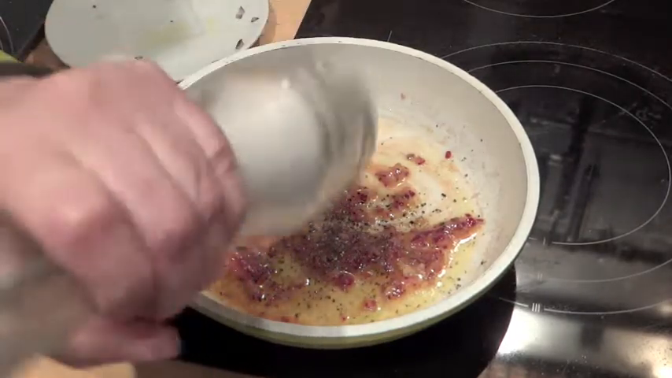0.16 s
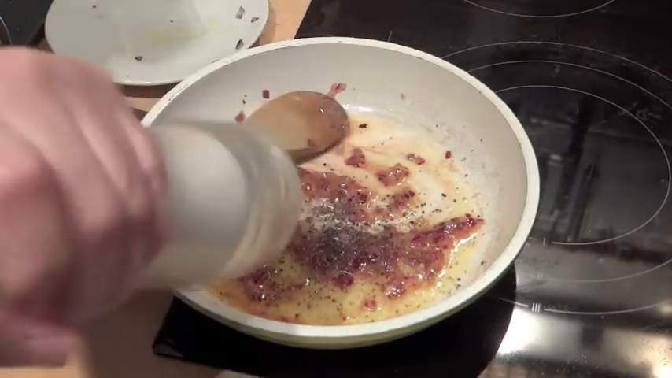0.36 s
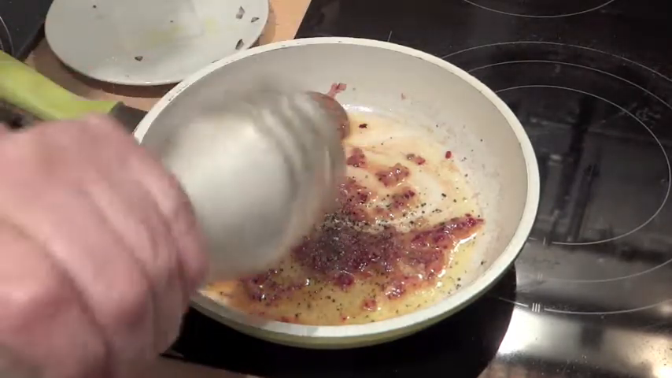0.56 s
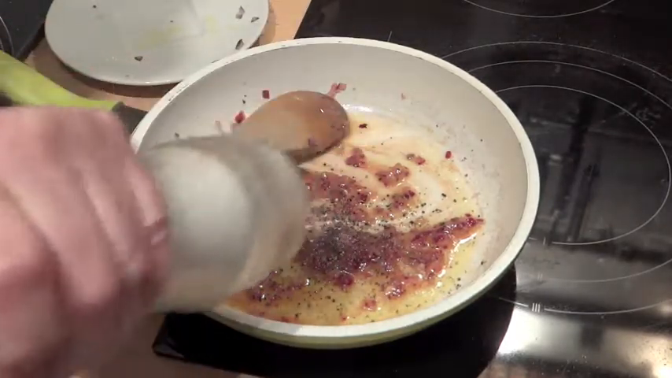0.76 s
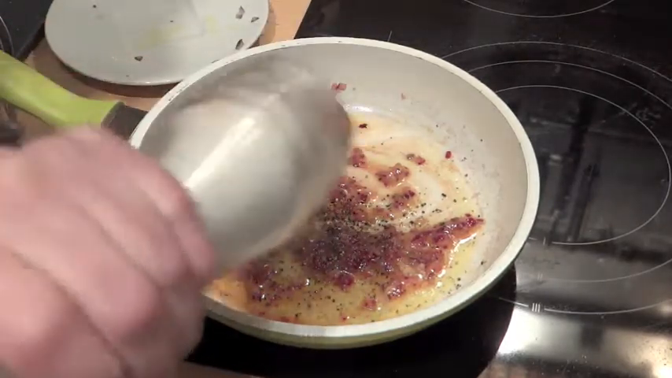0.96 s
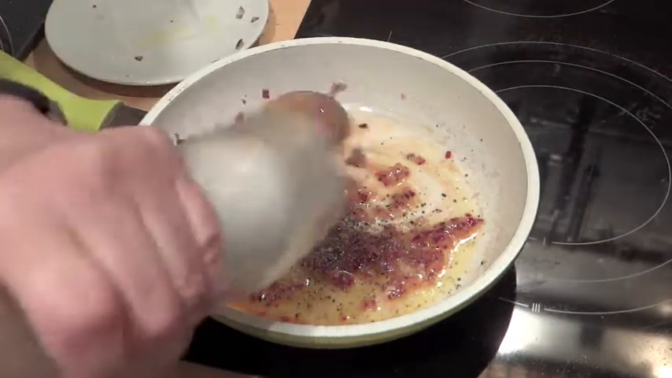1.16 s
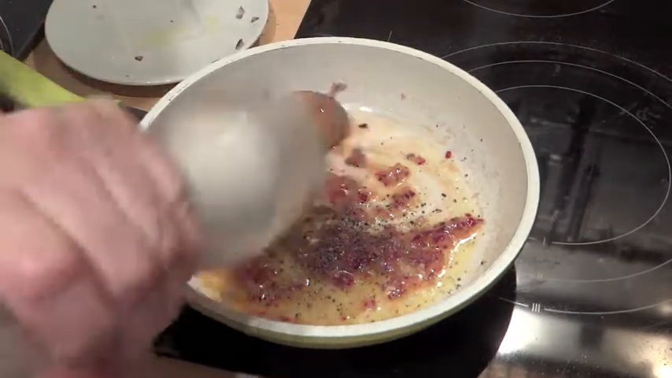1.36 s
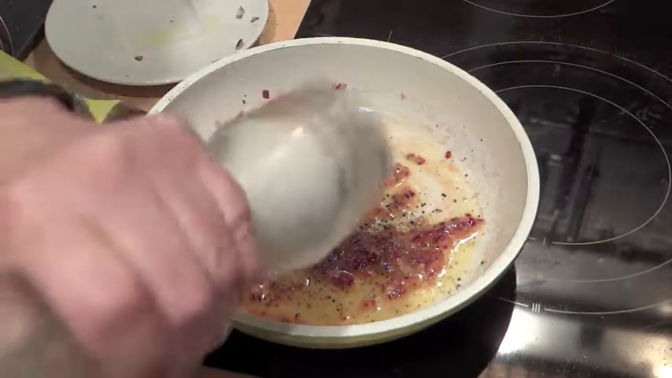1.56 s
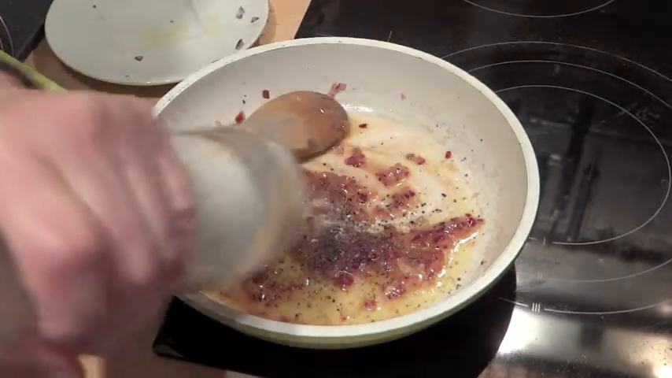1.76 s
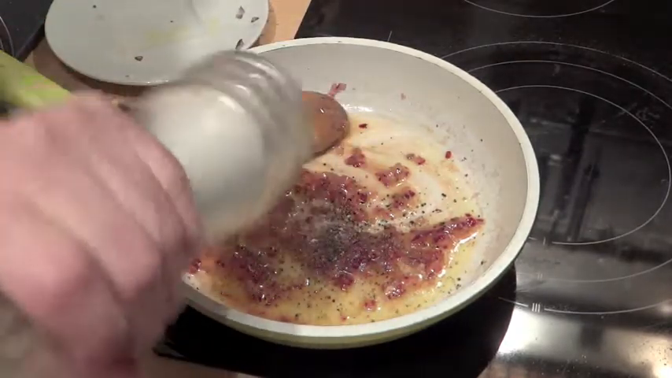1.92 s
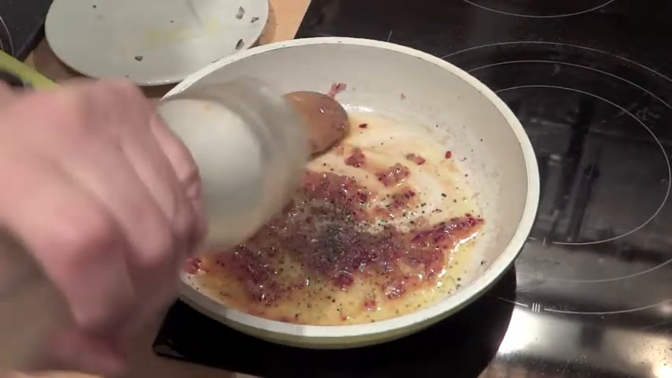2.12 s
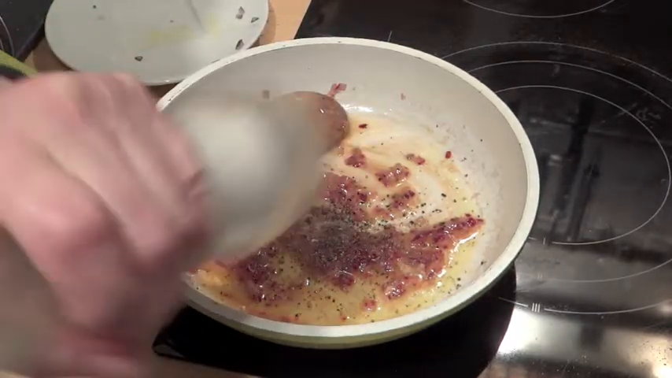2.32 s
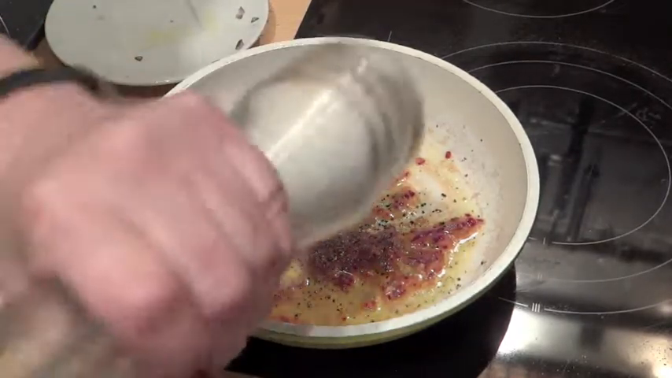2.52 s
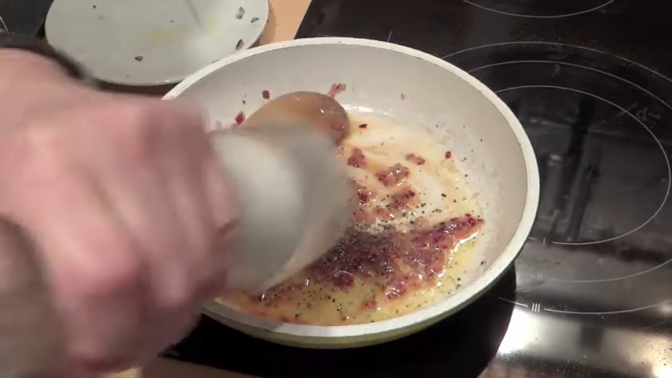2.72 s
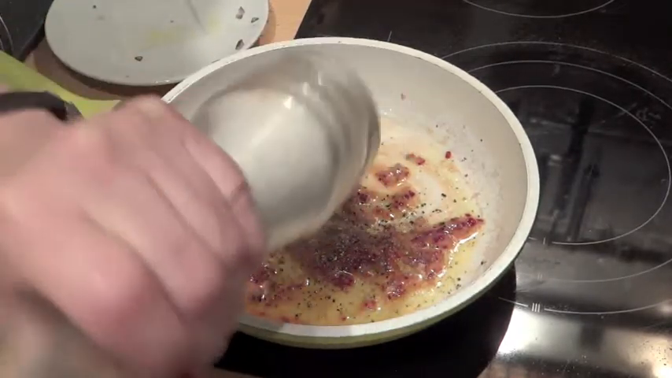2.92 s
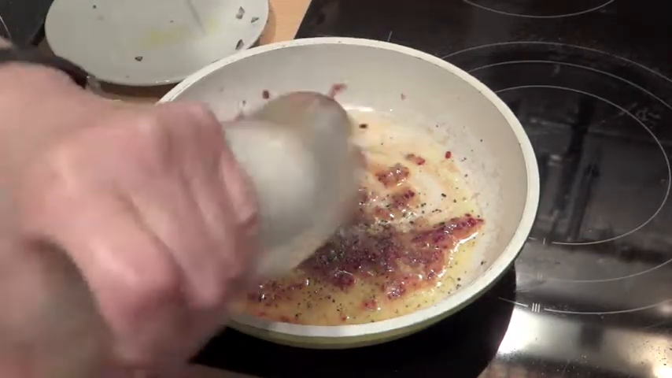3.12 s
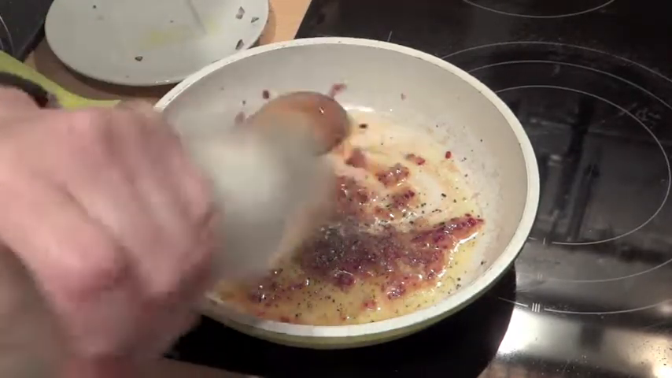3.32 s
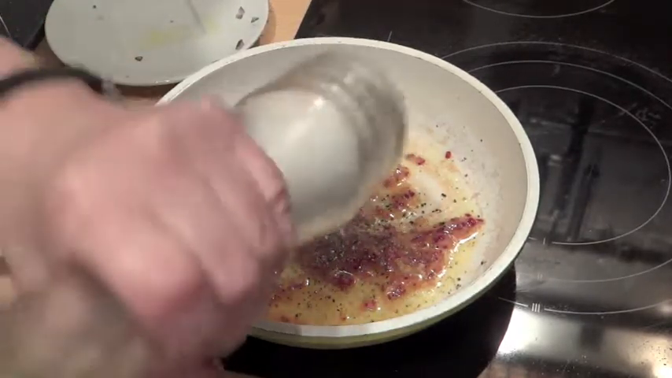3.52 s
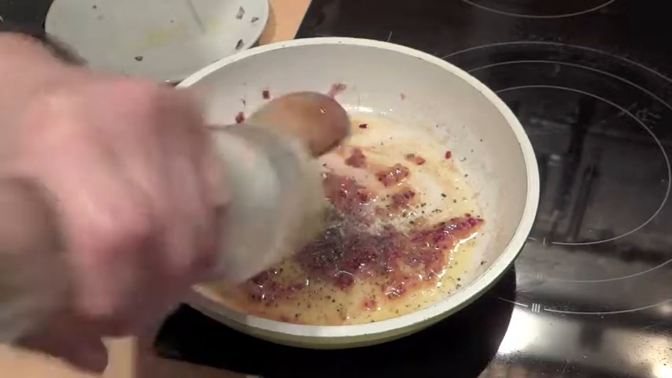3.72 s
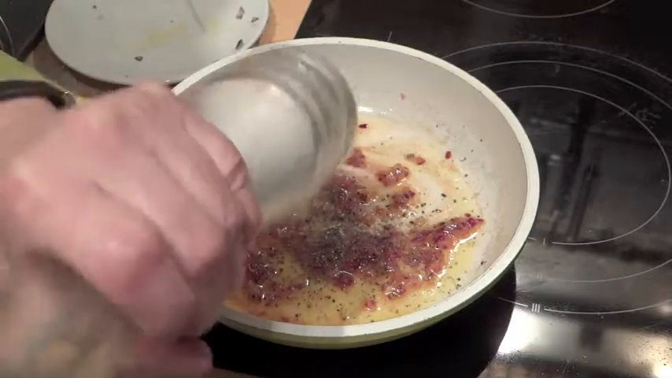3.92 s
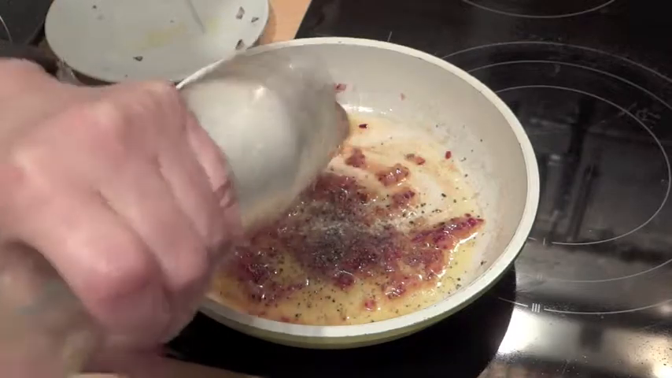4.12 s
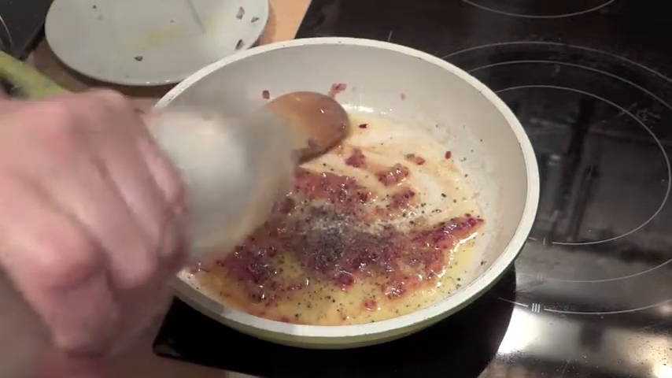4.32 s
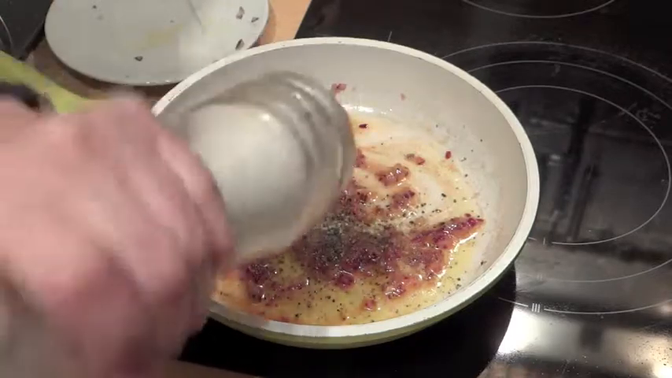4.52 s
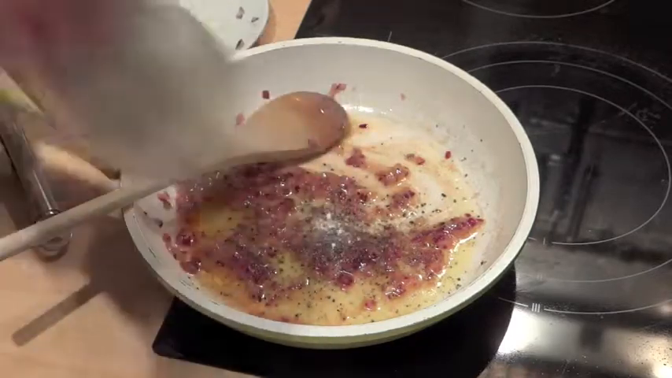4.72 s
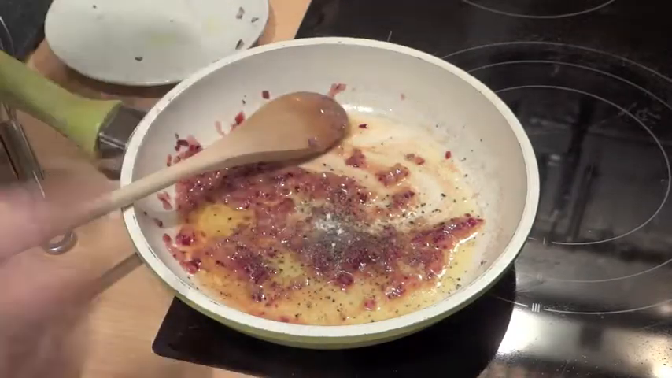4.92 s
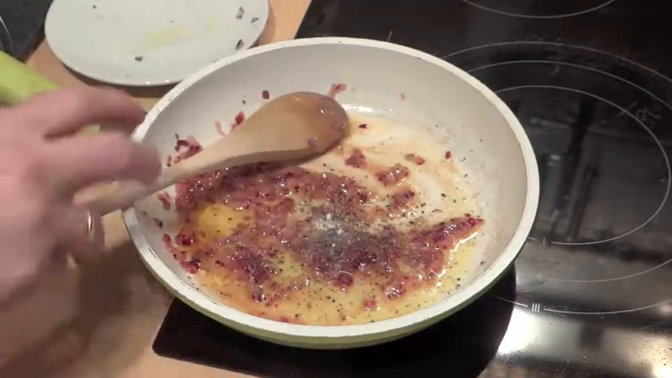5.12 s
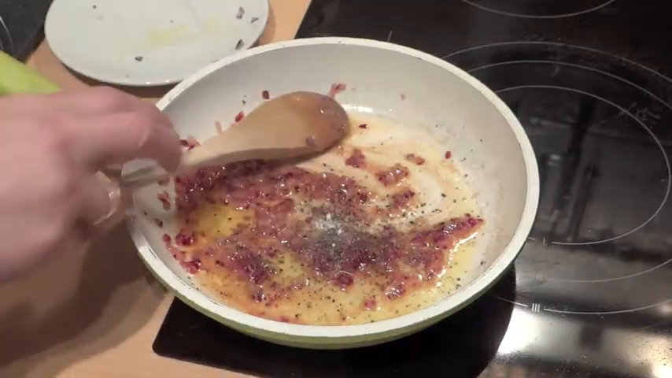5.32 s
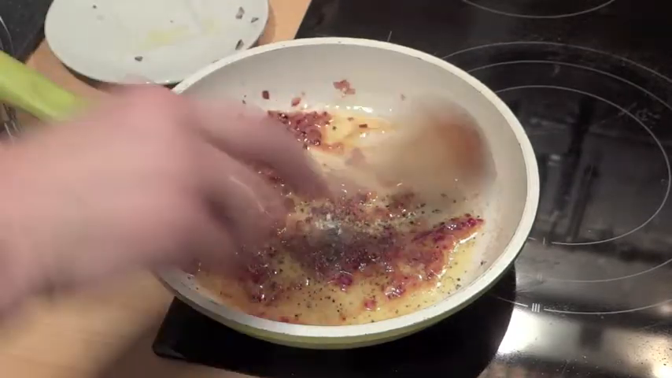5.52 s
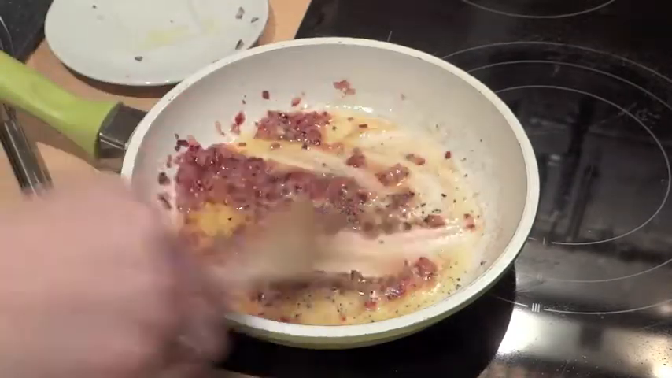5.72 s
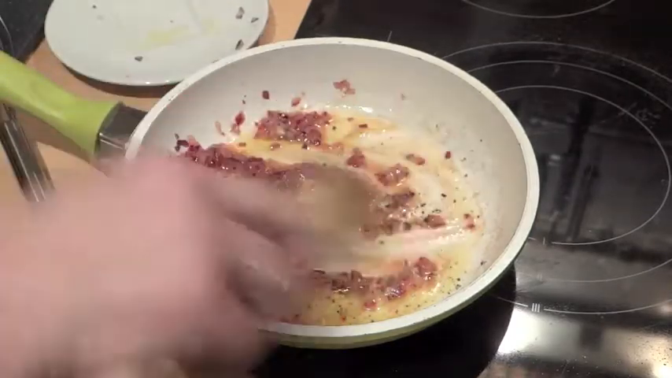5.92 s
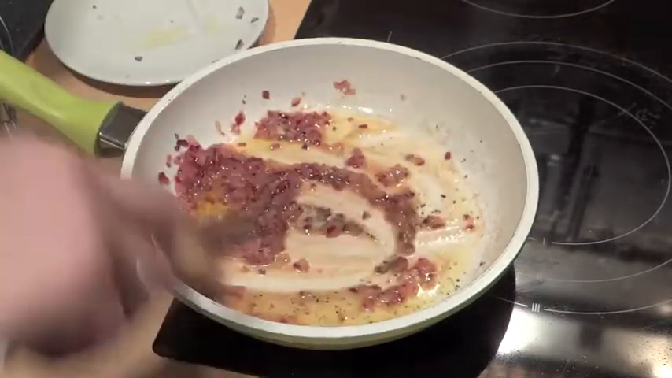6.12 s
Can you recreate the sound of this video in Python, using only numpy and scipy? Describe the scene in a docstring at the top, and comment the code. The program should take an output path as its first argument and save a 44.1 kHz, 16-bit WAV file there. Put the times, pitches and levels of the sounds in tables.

```python
"""A small kitchen with a steady hum and hiss, heard by a close pair of microphones.
A metal spice mill is twisted by hand over a pan in ten short strokes: grains fracture between the
burrs, and the impulses excite the modes of the mill's body. Between strokes the hand regrips with
soft friction. Then the mill is put away, and a wooden spoon knocks and scrapes through the pan,
driving its modes by impact and by friction."""
import sys
import numpy as np
from scipy import signal
from scipy.io import wavfile

SR = 44100
rng = np.random.default_rng(int(sys.argv[2]) if len(sys.argv) > 2 else 0)


def wav_out(sig):
    """Save sig, one row per channel (or a flat mono array), as 16-bit PCM at SR to the path in sys.argv[1]."""
    wavfile.write(sys.argv[1], SR, np.round(np.clip(np.atleast_2d(sig).T, -1, 1) * 32767).astype(np.int16))


N = 276494

# Levels in the tables are relative: each source applies its own gain.
# room noise spectrum: (frequency [Hz], density [dB])
ROOM_NOISE = [(15, -42), (25, -12.5), (99, -2.5), (152, -3.5), (212, 0.5), (344, -5), (635, -5),
              (1330, -11.5), (2160, -17.5), (2930, -11), (3410, -19), (5970, -18.5), (8310, -23.5),
              (9930, -17.5), (11000, -20), (14300, -50), (22000, -120)]
# likeness of left and right in that noise: (frequency [Hz], correlation [1])
COHERENCE = [(60, 1), (220, 0.58), (820, 0.0069), (3040, 0.13), (11200, 0.76)]
# wavering appliance hum: (frequency [Hz], bandwidth [Hz], level [dB])
HUM_PARTIALS = [(91.8, 1.8, -74.5), (215, 7.9, -70.5), (264, 19, -90)]

# sliding friction spectrum: (frequency [Hz], density [dB])
FRICTION_SPECTRUM = [(120, -30), (200, 8.5), (470, 1), (625, 12), (1020, -5), (1450, 5.5), (2160, 1.5),
                     (8550, -5.5), (11000, -22), (14300, -41), (22000, -120)]
# the hand slides to a new grip: (peak time [s], treble [dB], weight [dB], fade [dB/s])
REGRIPS = [(.15, -54.5, -2, 150), (.21, -48.5, -8, 102.5), (.69, -54.5, -15, 150), (1.127, -47, -5.5, 203),
           (1.202, -53.5, -15.5, 296), (1.556, -55, 3.5, 97), (1.63, -48.5, -7, 240), (2.064, -53, 4, 105),
           (2.11, -90, -1, 125.5), (2.524, -54, 2.5, 147.5), (2.644, -55, -8, 144), (3.1, -55, 3.5, 126.5),
           (3.162, -73, -18, 300)]
# hand and sleeve as the mill is put away: (time [s], treble [dB], weight [dB])
PUTTING_AWAY = [(4.6, -66, 3.5), (4.682, -58, -1.5), (4.735, -51, 2), (4.77, -50.5, -0.5), (4.9, -52, 0),
                (5.03, -52, -0.5), (5.108, -48, -5), (5.2, -52.5, -8.5), (5.3, -57.5, -18), (5.33, -75, -8)]

# resonances of the pan: (frequency [Hz], bandwidth [Hz], level [dB])
PAN_MODES = [(119, 20, 4), (151, 24, -3), (235.4, 48, -27), (313, 60, -4), (414, 44, -0.5), (566, 49, -14),
             (686, 53, -35), (1220, 67, -13), (1427, 40, -7), (1888, 71, -33), (2470, 46, -9.5),
             (2660, 71, -11), (3530, 100, -28.5), (3780, 65, -14.5), (4010, 55, -10.5), (5630, 250, -15),
             (8100, 1260, -5), (8920, 1300, 0)]
# the spoon drags: (time [s], treble [dB], weight [dB], squeak near 1.4 kHz re treble [dB])
SCRAPES = [(5.3, -64, -14, -28), (5.352, -52.5, -22, -10), (5.4, -54, -9, -23), (5.52, -68, 3, -15),
           (5.57, -65, 1, -10), (5.604, -47, -18, -21), (5.65, -57.5, 1, -11), (5.75, -58.5, 1, 2.5),
           (5.8, -68.5, 4, 5), (5.846, -52, -11, -9), (5.89, -51.5, -3.5, -2.5), (5.93, -59.5, 3, 8),
           (5.96, -60.5, 6, -2), (5.99, -52, 1, -9.5), (6.05, -50, 6.5, -2), (6.096, -44, 12.5, -7),
           (6.144, -58, 4, 5), (6.156, -52.5, -16, -4), (6.204, -53, 6.5, -5), (6.27, -51.5, 3.5, -1)]
# spoon on pan, the last three re the peak:
# (time [s], peak [dB], hob thump [dB], hollow ring [dB], click [dB])
SPOON_KNOCKS = [(5.579, -35.5, -7, -13, -26), (5.592, -28.5, -37, -26, -26), (5.612, -48, 8, -17, -10),
                (5.644, -38, -16, -26, -32), (5.675, -49, 3, -13, -14), (5.719, -53, 2, -7, -6),
                (6.068, -33.5, -23, -12, -10), (6.08, -35, -36, 5, -18), (6.095, -29, -19, -17, -22),
                (6.109, -35, -29, -5, -23), (6.151, -35, -27, -15, -10)]

# The mill's five bands are treble, rasp (5 kHz), body (3 kHz), middle and low.
# spectrum of crushing grains: (frequency [Hz], density [dB])
CRUSH_SPECTRUM = [(120, -48), (200, -19.5), (433, 0.5), (658, -5), (1470, -1), (2390, 8.5), (2880, 28),
                  (3640, -31), (8000, -5), (9950, -16), (11000, -74), (14300, -43), (22000, -120)]
# resonances of the mill's body: (frequency [Hz], bandwidth [Hz], level [dB])
MILL_MODES = [(424, 20, -2.5), (1120, 95, -1.5), (1226, 66, -7), (1556, 28.6, -5), (1838, 30, -8),
              (2520, 44, -20), (2740, 190, 6.5), (2906, 45, 4.5), (3006, 17.4, 0), (2950, 9, -10),
              (3040, 32, -28), (4143, 160, -4), (5224, 220, 0), (5585, 330, -1.5), (6170, 200, -22),
              (6800, 200, -14), (7580, 66, -2.5), (8106, 330, 5), (9040, 860, 4)]
# strokes of the wrist: (bite time [s], creep before it [s], jump at the bite [dB], hold [s],
# level at the bite [dB], midway offset [dB], level at the end of the hold [dB],
# extra rasp [dB], extra body [dB], extra low [dB])
STROKES = [(0.002, 0.029, -1.5, 0.016, -26.5, 1, -34, -0.5, -4, -2.5),
           (0.377, 0.044, 0.5, 0.086, -35.5, 0, -36.5, -3, -3, -3),
           (0.817, 0.033, 4, 0.097, -38, 2.5, -37.5, 2, 0.5, -0.5),
           (1.306, 0.047, 2, 0.076, -39.5, -2, -31.5, -0.5, -0.5, -2.5),
           (1.801, 0.042, 14, 0.063, -26.5, -3.5, -34.5, -1, -0.5, 0.5),
           (2.286, 0.059, 0.5, 0.11, -41, 4.5, -36, 1, 0.5, 1.5),
           (2.79, .05, 3, .12, -35, 0.5, -37.5, -2.5, 2.5, 0.5),
           (3.3, 0.054, 7.5, 0.074, -31.5, -7, -33.5, -1.5, -0.5, 2.5),
           (3.788, 0.044, 1, 0.11, -33.5, -4, -35.5, 3, -1.5, 1),
           (4.305, 0.04, 2, 0.063, -36, 0, -35.5, -0.5, 1.5, 0.5)]
# balance at the end of the hold, per band: (level [dB])
HOLD_BALANCE_DB = [-0.5, -1, -4.5, -8, -18]
# offset from that balance at the bite, per band: (level [dB])
BITE_OFFSET_DB = [-0.5, -3.5, -6.5, -1, 0.5]
# big grains split, the last three re the treble:
# (time [s], treble [dB], rasp [dB], body [dB], middle [dB])
FRACTURES = [(0.3714, -31, -14, -14, -23), (0.4265, -20, -6, -8.5, -28), (0.4461, -12, -12, -11, -24),
             (0.816, -23.5, -13, -4, -23), (0.8243, -25, 7, -14, -22), (0.8684, -26, -8, -8, -20),
             (0.9065, -17.5, -5, -4.5, -12), (0.9234, -23, 7, 4.5, -22), (1.2973, -38, -11, -20.5, -4),
             (1.308, -29.5, 5.5, -16, -14), (1.3623, -9, -16, -8.5, -13), (1.7745, -47, -13, -9, -8),
             (1.788, -41, -12, 0, 6), (1.802, -23, 4, 4, -11), (1.815, -20, -19, 0, -34),
             (1.8378, -13, -19, -11, -24.5), (1.892, -21, -4, -9, -25), (2.2859, -20.5, -15, -16, -13),
             (2.3388, -36, -10, -8, -17.5), (2.3661, -29, -11, -2, -23), (2.3834, -20.5, 4, 0, -18),
             (2.7828, -35, -11, -12, -5), (2.7867, -29, -17, -22, -11), (2.83, -16.5, -9, -7, -7),
             (2.8682, -27, -11, 4, -2), (2.8788, -22, 1, 3, -3), (2.8981, -19, -1, 4.5, -12),
             (3.2994, -18.5, -25, -2.5, -10), (3.347, -32.5, -12, -11, -17),
             (3.3692, -15, -13.5, -24, -7.5), (3.4, -20.5, -1, -4, -31), (3.7706, -26, -17, -6, -15),
             (3.7907, -18, -11, -23, -19), (3.8114, -19, 0, -4, -22), (3.8314, -28, 5, -12.5, -15.5),
             (3.8648, -21.5, -12, -10.5, 0), (3.8688, -21, 6, 0, 2.5), (3.8818, -38, -7, -9, -21),
             (4.289, -28, -15, -4, -18), (4.3075, -21, 2, 1.5, -17), (4.362, -16, -13, -12, -14.5)]
# the mill's head ticks in its play as the hand takes hold, the last four re the treble:
# (time [s], treble [dB], rasp [dB], body [dB], middle [dB], low [dB])
HEAD_TICKS = [(0.1411, -49.5, 15.5, 13, 9, -24), (0.1984, -46.5, 12, -22, -21, 1),
              (1.1156, -47.5, 12.5, 10.5, 11, 2), (1.5485, -41.5, 9, 2, -26, 3),
              (2.094, -38.5, -19.5, -9.5, -8, 1), (2.5236, -50, 17, 15.5, -19, -18),
              (2.7429, -51.5, 9, -4, 20, -27), (2.7736, -35, 4.5, -8, 3, 4), (3.0931, -46, 7, 9.5, 0, 6.5),
              (3.2737, -46, 7, -7, 10, -12.5), (4.4425, -50.5, -6.5, 19, -2.5, -15)]


def from_db(db):
    """Amplitude grows tenfold for every 20 dB."""
    return np.exp(np.asarray(db) * (np.log(10) / 20))


def unit_rms(x):
    """Normalisation to a mean power of one."""
    return x / np.sqrt(np.mean(x ** 2) + 1e-20)


def at_hz(curve, hz):
    """Interpolation on a logarithmic frequency axis."""
    frequencies, values = np.transpose(curve)
    return np.interp(np.log(hz), np.log(frequencies), values)


def envelopes(rows):
    """Linear interpolation of each column in time; the level is silent outside the table."""
    times, level_db, *others = np.transpose(rows)
    t = np.arange(N) / SR
    return np.interp(t, times, level_db, left=-200, right=-200), *[np.interp(t, times, c) for c in others]


def band_gains(treble_db, weight_db, balance_db, shares):
    """Spectral tilt: each band, from the top down, is lifted by its share of the weight."""
    return from_db(treble_db) * from_db(np.c_[balance_db] + np.c_[shares] * weight_db)


def drift(rate_hz):
    """Low-passed noise: a slow random fluctuation of rms one."""
    step = 40
    pole = np.exp(-2 * np.pi * rate_hz * step / SR)
    slow = signal.lfilter([1], [1, -2 * pole, pole ** 2], rng.standard_normal(N // step + 2002))[2000:]
    return np.interp(np.arange(N) / step, np.arange(len(slow)), unit_rms(slow))


def decay(impulses, decay_s):
    """Exponential relaxation after each impulse."""
    return signal.lfilter([1], [1, -np.exp(-1 / (decay_s * SR))], impulses + 1e-18)


def resonate(x, hz, width_hz):
    """A damped oscillator, scaled to conserve the power of white noise."""
    r = np.exp(-np.pi * width_hz / SR)
    feedback = [1, -2 * r * np.cos(2 * np.pi * hz / SR), r * r]
    return signal.lfilter(np.sqrt((1 - r * r) / 2) * np.array([1, 0, -1]), feedback, x + 1e-18)


def shot_noise(per_s, spread_db):
    """A Poisson train of clicks of uneven size, rms one."""
    sizes = from_db(spread_db * np.minimum(rng.exponential(1, N), 5)) * rng.choice([-1, 1], N)
    return unit_rms(sizes * (rng.random(N) < per_s / SR))


def rough_contact(gains, edges_hz, spectrum, per_s, spread_db, q, flicker_db, clumping,
                  modes=(), modes_db=0, grip_db=0, blows=None):
    """Impulse excitation: in each band, clicks drive four broad resonances and any modes lying there."""
    slips = (rng.random(N) < 110 / SR) * rng.random(N)  # grains give way suddenly, in clumps
    clumps = unit_rms(1 + clumping * decay(slips, decay_s=0.0028))
    out = np.zeros(N)
    for band, (gain, high, low) in enumerate(zip(gains, edges_hz, edges_hz[1:])):
        pitches = np.geomspace(low, high, 9)[1::2]
        heights = unit_rms(from_db(at_hz(spectrum, pitches)) * np.sqrt(pitches))
        clicks = gain * clumps * shot_noise(per_s, spread_db)
        pitch_of_click = rng.integers(0, 4, N)
        blow = 0 if blows is None else blows[band]  # a blow sets everything ringing at once
        for k, hz in enumerate(pitches):
            flicker = from_db(flicker_db * drift(15))
            force = heights[k] * (clicks * (pitch_of_click == k) * flicker + blow)
            out += resonate(resonate(force, hz, hz / q), hz, 2 * hz / q)
        for hz, width_hz, level_db in modes:
            if low <= hz < high:
                grip = from_db(grip_db * drift(6.6))  # the shifting grip varies each mode's strength
                out += from_db(level_db + modes_db) * resonate((clicks + blow) * grip, hz, width_hz)
    return out


def hiss_and_hum():
    """Partly coherent stereo noise in half octaves; narrow resonances turn noise into a wavering hum."""
    hiss, edges_hz = 0, 31 * 2 ** np.arange(0, 8.6, 0.5)
    white = rng.standard_normal((2, 2, N))  # neighbouring bands get independent noise
    for k, (low, high) in enumerate(zip(edges_hz, edges_hz[1:])):
        bandpass = signal.butter(2, [low, high], "band", fs=SR, output="sos")
        mid, side = signal.sosfilt(bandpass, white[k % 2])
        hz = np.sqrt(low * high)
        coherence = at_hz(COHERENCE, hz)
        gain = from_db(at_hz(ROOM_NOISE, hz) + 0.25 * drift(20))
        hiss += gain * (np.sqrt(1 + coherence) * mid + np.sqrt(1 - coherence) * side * [[1], [-1]])
    hum = sum(from_db(db) * resonate(white[0, 0], hz, width_hz) for hz, width_hz, db in HUM_PARTIALS)
    return from_db(-60) * unit_rms(hiss) + hum


def reverberation(x, t60_s=0.17, wall_cutoff_hz=14200):
    """Repeated reflection with absorption: each round of an echo is weaker and duller."""
    echoes = np.zeros((3, N))  # left, right and shared: six feedback delays each
    pole = np.exp(-2 * np.pi * wall_cutoff_hz / SR)
    lags = (rng.uniform(0.0055, 0.03, 18) * SR).astype(int)
    for k, lag in enumerate(lags):
        loop, state = x.copy(), [0.]
        gain = from_db(-60 * lag / SR / t60_s)
        for i in range(lag, N, lag):
            reflected, state = signal.lfilter([gain * (1 - pole)], [1, -pole], loop[i - lag:i], zi=state)
            loop[i:i + lag] += reflected[:N - i]
        echoes[k % 3] += (loop - x) * (-1) ** (k // 3)
    return echoes[:2] + from_db(-1.5) * echoes[2]


def hand_friction(rise_db_per_s=346.5):
    """Sliding friction: dense, even contacts merge into a soft noise that swells at each regrip."""
    tilt = dict(balance_db=[-2.5, -5, -11.5, -14.5], shares=[0.001, 0.6, 1.1, 1.2])
    gains = band_gains(*envelopes(PUTTING_AWAY), **tilt)
    t = np.arange(N) / SR
    for peak_s, treble_db, weight_db, fade_db_per_s in REGRIPS:
        span = (t > peak_s - 0.2) & (t < peak_s + 0.5)
        drop_db = np.where(t[span] < peak_s, rise_db_per_s, fade_db_per_s) * np.abs(t[span] - peak_s)
        gains[:, span] += band_gains(treble_db - drop_db, weight_db, **tilt)
    return rough_contact(from_db(-13) * gains, [10280, 7000, 2430, 820, 219], FRICTION_SPECTRUM,
                         per_s=15000, spread_db=2.5, q=2.76, flicker_db=2.5, clumping=0.15)


def spoon_scrapes():
    """Forced vibration: wood dragged over the gritty pan floor drives the pan's modes."""
    treble_db, weight_db, squeak_db = envelopes(SCRAPES)
    gains = band_gains(treble_db, weight_db, [-0.5, 0.5, -6, -2, -17], shares=[0, 0.39, 0.68, 0.042, 1])
    gains[3] *= from_db(squeak_db)
    return rough_contact(from_db(-14) * gains, [10800, 6860, 3500, 1880, 870, 301], FRICTION_SPECTRUM,
                         per_s=9500, spread_db=0.5, q=2.4, flicker_db=3, clumping=0.34,
                         modes=PAN_MODES, modes_db=6, grip_db=5.5)


def spoon_knocks():
    """Impact and free decay: a blow and a brief chatter ring the pan; the hob under it thumps."""
    blows = np.zeros((4, N))
    for time_s, peak_db, thump_db, hollow_db, click_db in SPOON_KNOCKS:
        blows[:, round(time_s * SR)] = from_db(peak_db + np.array([thump_db, 0, hollow_db, click_db]))
    chatter = decay(blows, decay_s=0.006) * shot_noise(per_s=5000, spread_db=2.5)
    force = from_db(21) * blows + from_db(1) * chatter
    out = from_db(-10.5) * resonate(resonate(force[3], 7600, 2500), 7600, 2500)  # contact click
    for hz, width_hz, level_db in PAN_MODES:
        band = np.searchsorted([200, 500, 900], hz)
        out += from_db(level_db - 8) * resonate(force[band], hz, width_hz)
    return out


def twist_gains(creep_db=-42.5, jump_s=0.0017, release_db_per_s=232):
    """Amplitude modulation in five bands: the burrs creep, bite and hold, then the wrist runs out."""
    gains, t = np.zeros((5, N)), np.arange(N) / SR
    for bite_s, creep_s, jump_db, hold_s, bite_db, midway_db, end_db, rasp_db, body_db, low_db in STROKES:
        end_s = bite_s + hold_s
        span = (t > bite_s - creep_s) & (t < bite_s + 0.5)
        corners = [(bite_s - creep_s, bite_db + creep_db), (bite_s - jump_s, bite_db - jump_db),
                   (bite_s, bite_db), (bite_s + hold_s / 2, (bite_db + end_db) / 2 + midway_db),
                   (end_s, end_db), (end_s + 1, end_db - release_db_per_s)]
        level_db = np.interp(t[span], *np.transpose(corners))
        offset_db = np.outer(BITE_OFFSET_DB, np.interp(t[span], [bite_s, end_s], [1, 0]))
        balance_db = np.add(HOLD_BALANCE_DB, [0, rasp_db, body_db, 0, low_db])
        gains[:, span] += from_db(level_db + offset_db + np.c_[balance_db])
    return gains


def spice_mill():
    """Brittle fracture rings the body: a dense crunch, plus a blow and a burst at each split or tick."""
    # the low thud of a split lies about 9.5 dB under its middle band
    splits = [(*row, row[-1] + rng.normal(-9.5, 1.5)) for row in FRACTURES]
    impulses = np.zeros((5, N))
    for time_s, treble_db, *lower_db in splits + HEAD_TICKS:
        impulses[:, round(time_s * SR)] = from_db(treble_db + np.array([0, *lower_db]))
    bursts = decay(impulses, decay_s=0.0048) * shot_noise(per_s=20000, spread_db=4)
    blows = from_db(-13.5) * impulses + from_db(-27.5) * bursts
    gains = from_db(-12.5) * twist_gains()
    return rough_contact(gains, [12400, 6036, 4050, 2117, 836, 278.7], CRUSH_SPECTRUM,
                         per_s=7000, spread_db=2.5, q=2.38, flicker_db=4, clumping=1,
                         modes=MILL_MODES, modes_db=-1, grip_db=3.5, blows=blows)


def scene():
    """Superposition of direct sound, reverberation and background; the mill is a little to the left."""
    direct = spice_mill() * from_db([[0.4], [-0.4]]) + hand_friction() + spoon_scrapes() + spoon_knocks()
    return direct + from_db(-13.5) * reverberation(direct.mean(axis=0)) + hiss_and_hum()


def record(dry):
    """Band limiting: two steep low-pass filters remove the treble above about 11 kHz."""
    elliptic = signal.ellip(10, 0.5, 32, 11050, fs=SR, output="sos")
    chebyshev = signal.cheby2(12, 50, 12300, fs=SR, output="sos")
    return signal.sosfilt(chebyshev, signal.sosfilt(elliptic, dry))


dry = scene()
out = record(dry)
wav_out(out)
```